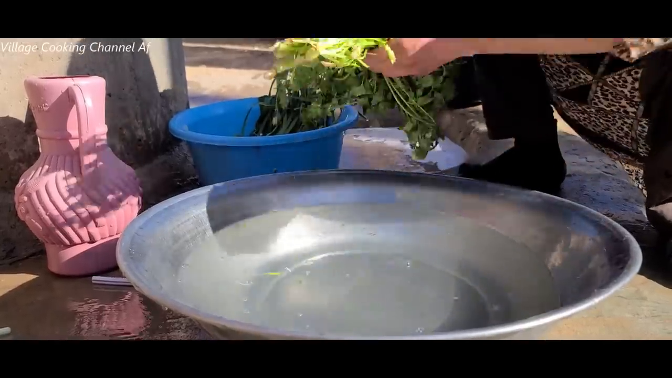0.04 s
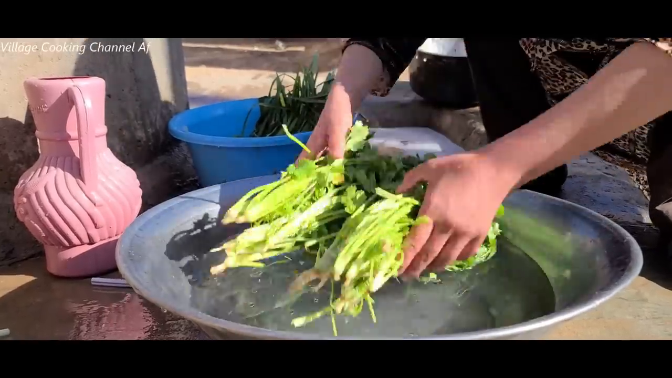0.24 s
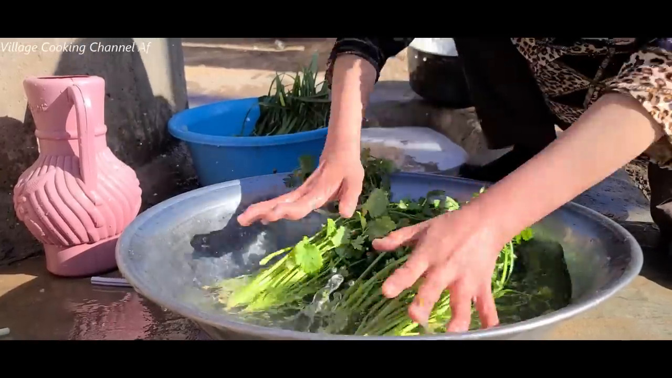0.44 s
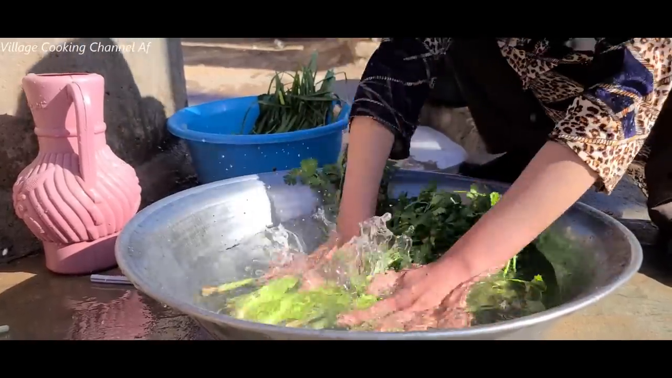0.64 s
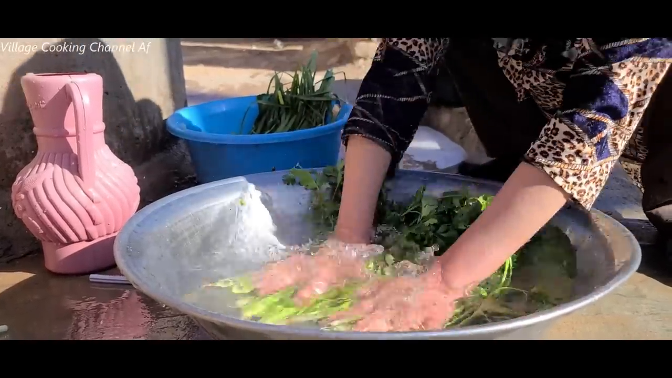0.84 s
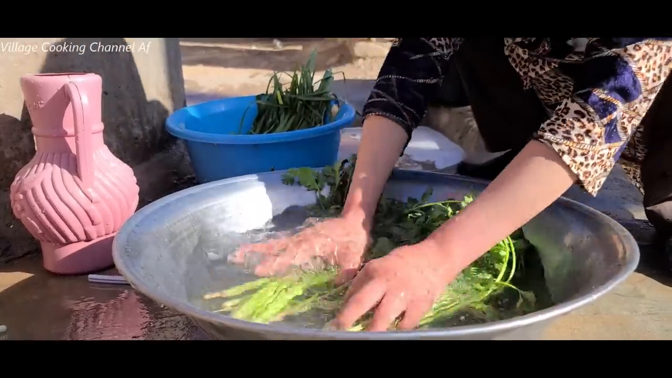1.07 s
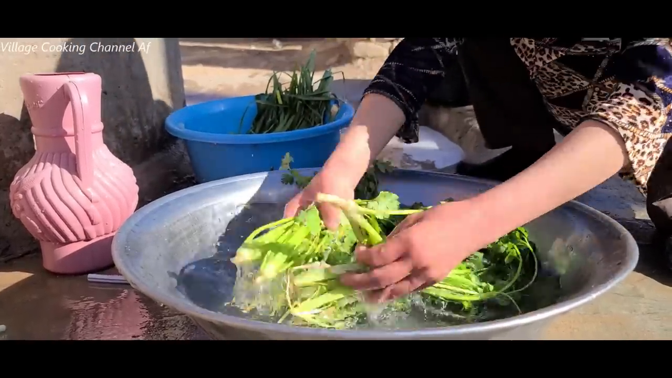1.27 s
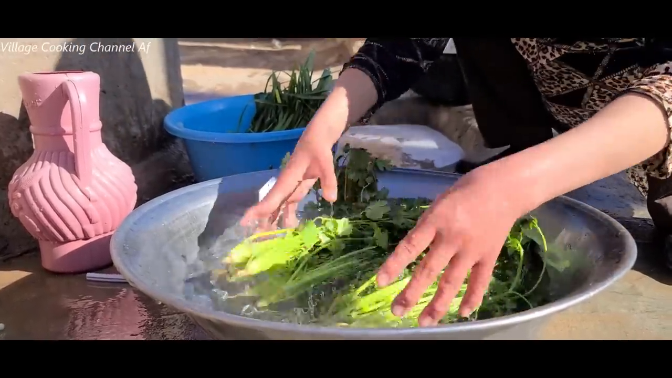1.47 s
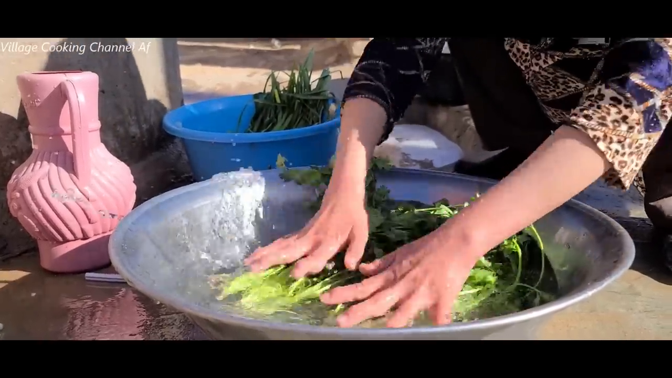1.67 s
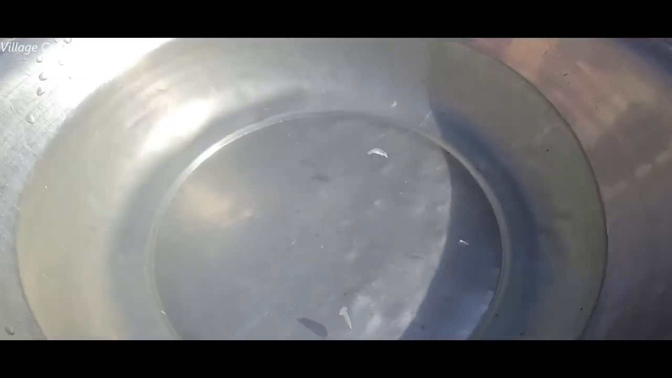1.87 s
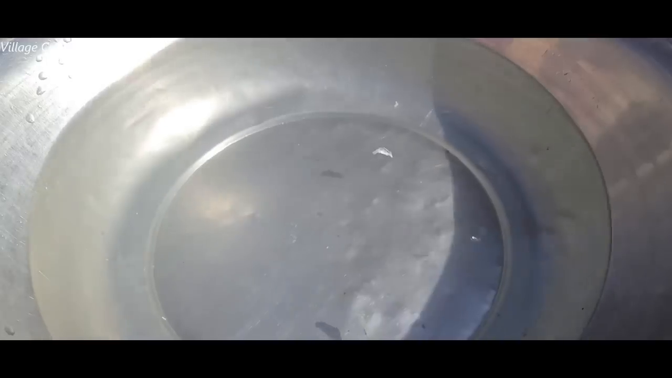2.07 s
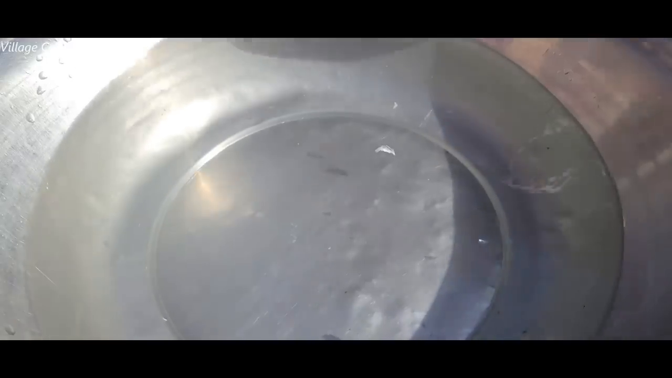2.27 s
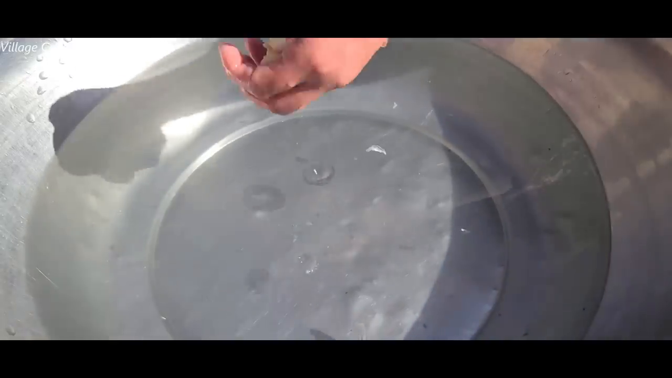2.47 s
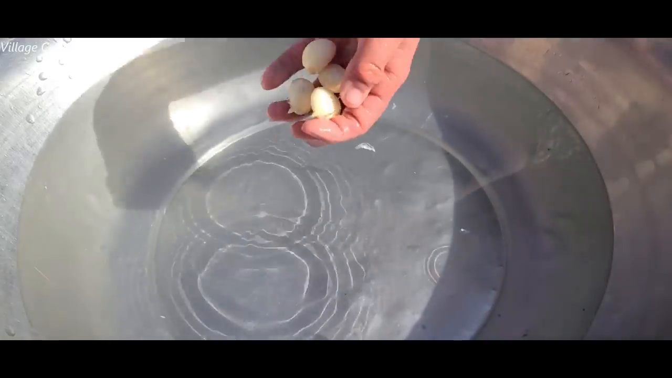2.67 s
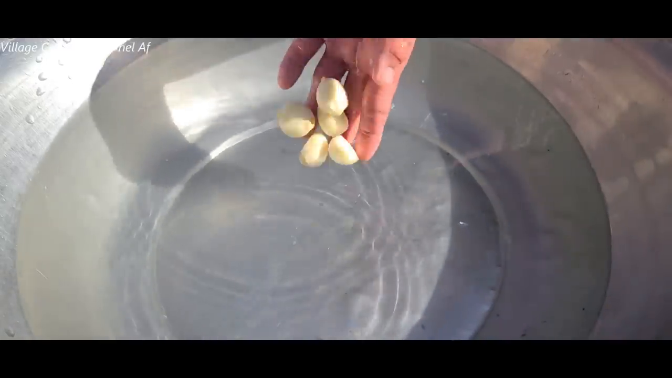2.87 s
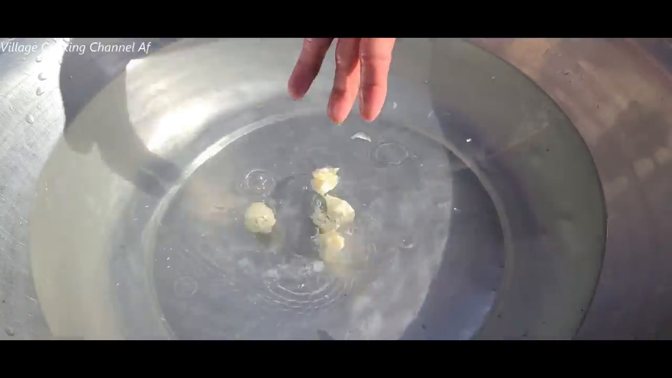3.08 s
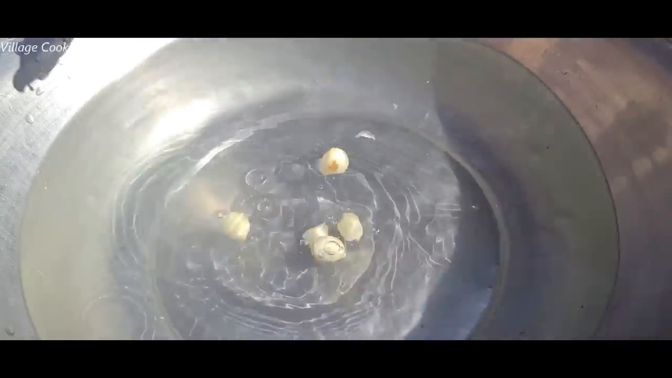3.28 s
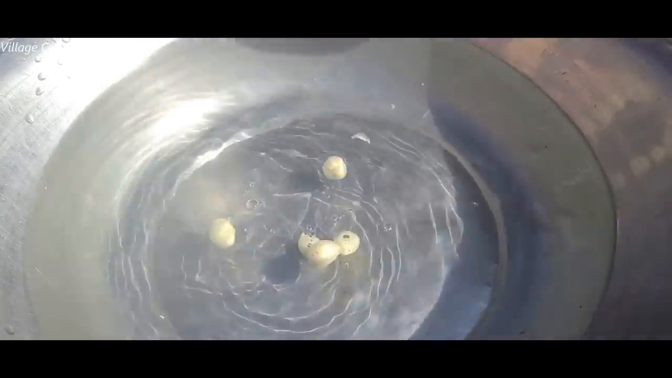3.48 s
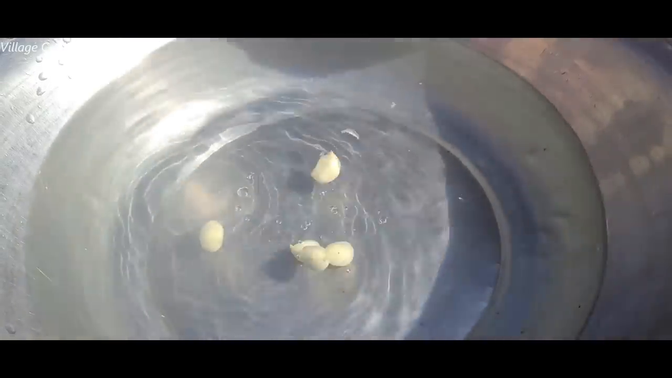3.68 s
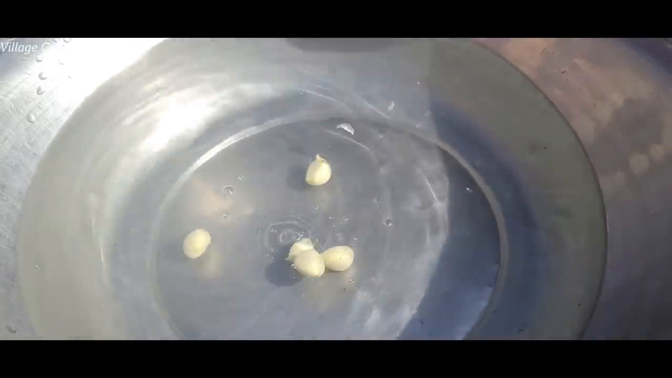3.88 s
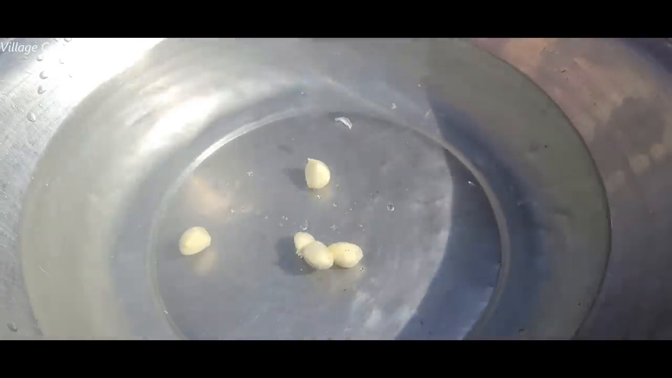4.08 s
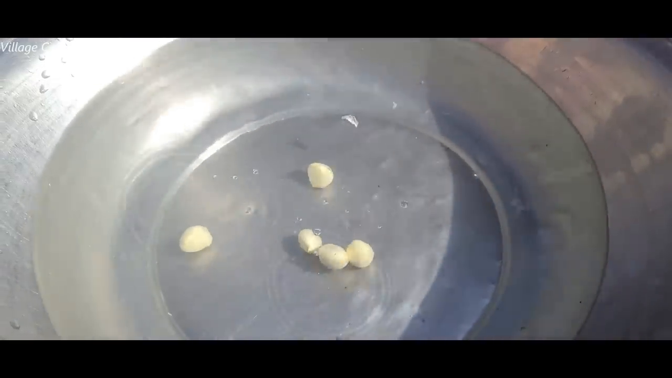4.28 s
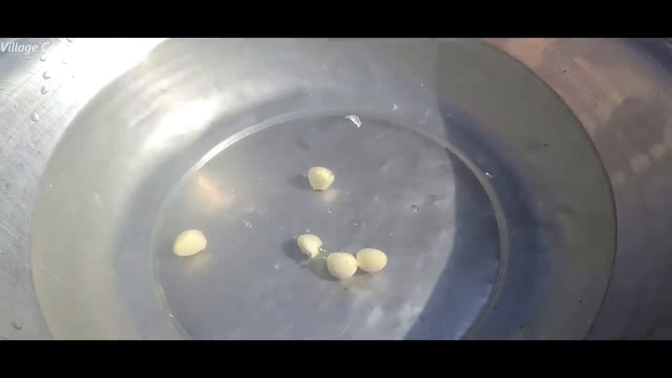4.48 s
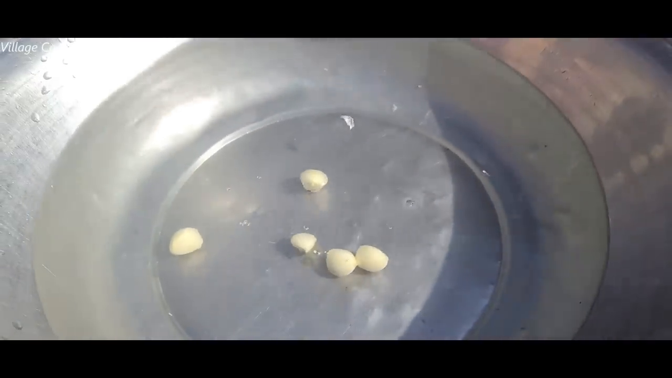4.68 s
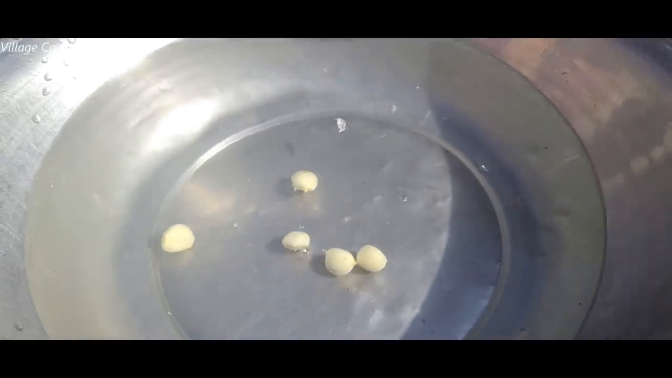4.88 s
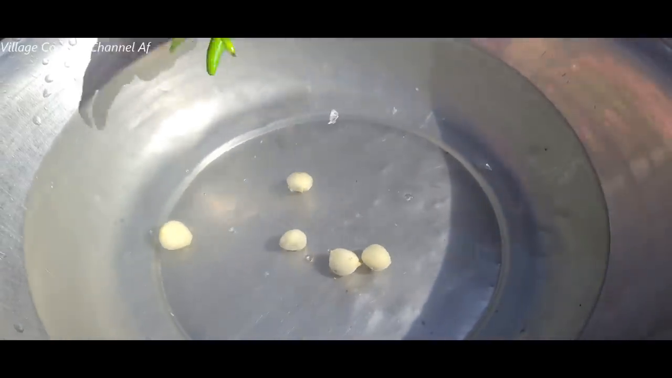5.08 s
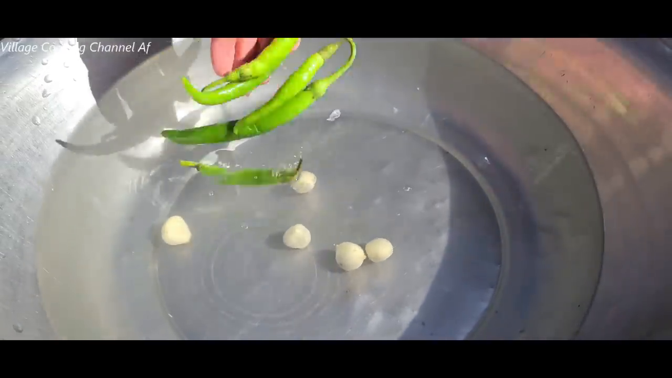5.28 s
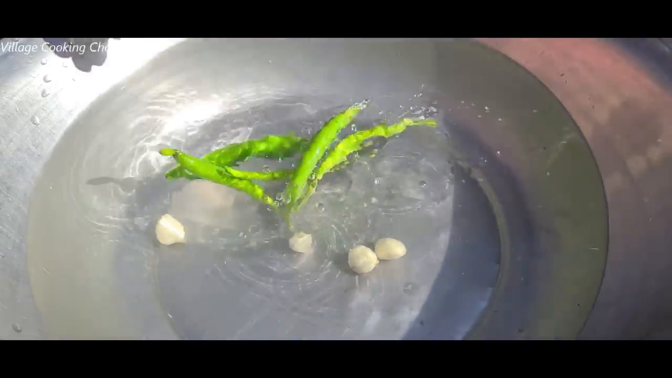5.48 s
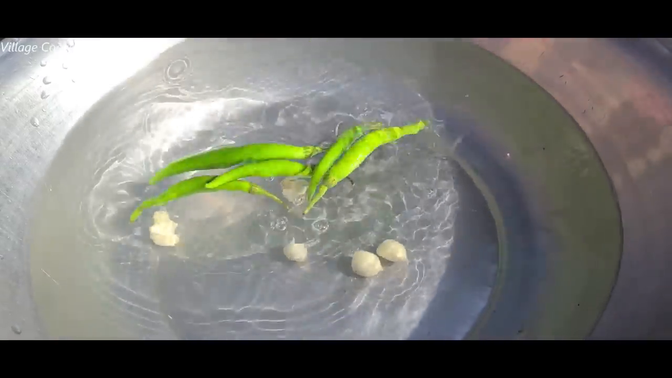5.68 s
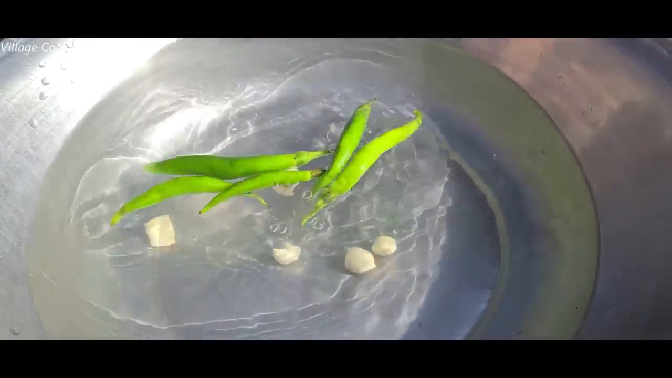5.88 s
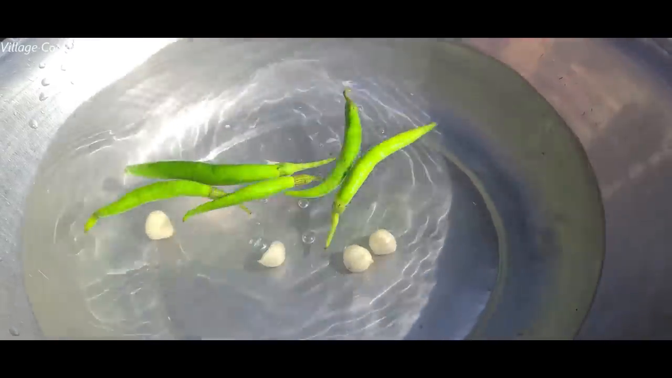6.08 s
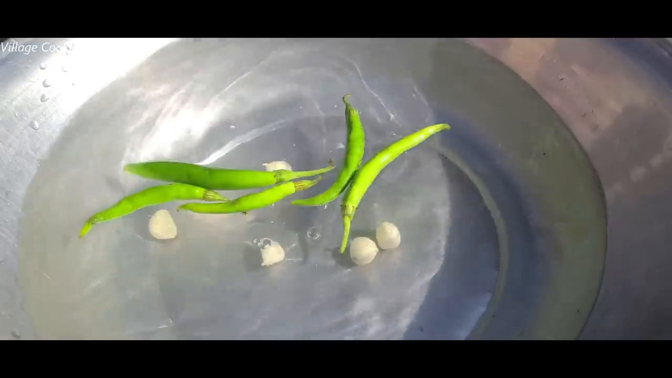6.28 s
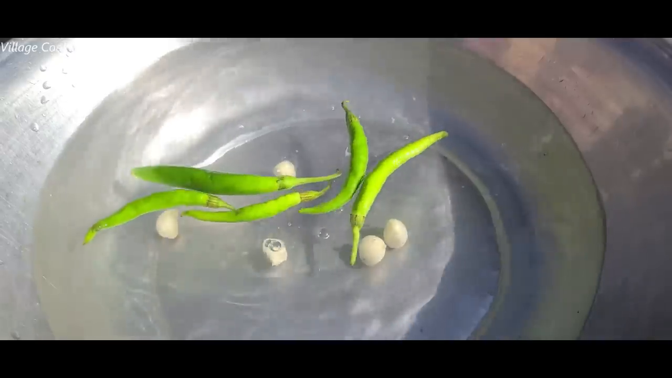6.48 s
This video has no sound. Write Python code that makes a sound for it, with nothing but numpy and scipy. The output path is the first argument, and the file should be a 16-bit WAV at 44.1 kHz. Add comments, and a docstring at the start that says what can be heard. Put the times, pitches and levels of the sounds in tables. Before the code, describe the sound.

Bunches of greens are pushed and lifted in a water-filled metal basin, with splashes, bubbly gulps, crackling spray and a faint metallic singing. It stops dead for a moment. Then, closer to the basin with low outdoor air, faint bumps precede garlic cloves that plop in and ring the bottom like a gong. Later chillies slap in more softly, followed by dull knocks.

```python
"""Hands dunk and lift greens in a wide metal basin of water: bubble clouds, crackling spray and gulps over a
faintly singing wall. A moment of silence. Then, nearer the basin over a low outdoor rush, a few dull bumps;
garlic cloves and later chillies drop in and ring its bottom like a gong, as decaying modes and a noise wash.
More dull bumps follow. Water is grains and rising tones; slaps, rustles and air are filtered noise."""
import sys
import numpy as np
from scipy import signal
from scipy.fft import rfft, irfft, next_fast_len
from scipy.io import wavfile
from scipy.ndimage import map_coordinates

SR = 44100
rng = np.random.default_rng(int(sys.argv[2]) if len(sys.argv) > 2 else 0)


def wrap_up_sound(samples):
    """Save the sound to the file named by the first command line argument, as 16-bit audio."""
    columns = np.atleast_2d(samples).T
    # keep every value between -1 and 1, then stretch to whole-number steps
    tamed = np.clip(columns, -1, 1)
    steps = np.round(tamed * 32767).astype(np.int16)
    wavfile.write(sys.argv[1], SR, steps)


N = 288472

# water running off the leaves: t/s, strength/dB (each layer adds its own offset)
TRICKLE = [(0, -57.5), (.2, -50), (.42, -53), (.52, -63.5), (.72, -45), (.92, -57.5), (1.15, -49.5),
           (1.53, -49.5), (1.66, -72)]
# vegetables land on the bottom: t/s, ring level/dB, off-centre share/0-1, clang level/dB,
# corner f/Hz above which the soft contact dulls the clang
BLOWS = [(3.007, -2, 0.41, -33, 4600), (3.05, -5.5, 0, -32, 7000), (3.062, -7, 0, -33.5, 5000),
         (3.11, -4.5, 0.26, -32, 3420), (5.463, -6, 1, -46, 1410), (5.523, -17.5, 0.94, -46.5, 1600),
         (5.579, -18.5, 1, -53, 2000)]
# columns of the push table
SLOSH_COLUMN, SPRAY_COLUMN = 2, 3


def rinsing(slosh_db=-2, spray_db=-1.0, blend_db=-38):
    """Each push of the hands stirs up a cloud of bubbles and throws a crackling spray; grains merge into foam."""
    # bubbling colour: f/Hz, level/dB
    slosh_colour = [(150, -22.5), (330, -9.5), (520, -0.5), (750, -4.5), (1050, 3), (1700, 5.5),
                    (2400, -11.5), (4000, -9), (9000, -68.5)]
    # spatter colour: f/Hz, level/dB
    spray_colour = [(700, -26.5), (1800, -8.5), (3300, 2.5), (5500, 0), (7500, -10.5), (10000, -11.5),
                    (12500, -3), (16000, -11)]
    trickle_slosh_db, trickle_spray_db = -3, -13  # over the trickle strength
    fallback_db, fallback_decay_s = -22, 0.074  # thrown spray rains back: level under the push
    # foam shares: in a trickle, in a hard push
    slosh_foam, spray_foam = (.35, .42), (.6, .25)

    trickle_db = over_time(TRICKLE)
    slosh_power = amp(trickle_db + trickle_slosh_db) ** 2 + pushed(SLOSH_COLUMN, slosh_db)
    spray_power = amp(trickle_db + trickle_spray_db) ** 2 + pushed(SPRAY_COLUMN, spray_db)
    spray_power = spray_power + pushed(SPRAY_COLUMN, fallback_db, fallback_decay_s)
    cloud = grains(count=5200, low_hz=350, high_hz=3800, cycles=8, spread_db=3.5, size=800)
    drops = grains(count=10000, low_hz=1800, high_hz=15500, cycles=9, spread_db=4.5, size=400)

    def foaming(power, grain, colour, foam_shares):
        """Shift from single grains to noise, or back, as the power grows."""
        in_trickle, in_push = foam_shares
        merged = in_trickle + (in_push - in_trickle) * power / (power + amp(blend_db) ** 2)
        single = unit(filtered(grain, lambda hz: amp(along(colour, hz)) * np.sqrt(hz)))
        foam = coloured(rng.standard_normal((2, N)), colour)
        return np.sqrt(power * (1 - merged)) * single + np.sqrt(power * merged) * foam

    slosh = foaming(slosh_power, cloud, slosh_colour, slosh_foam)
    return slosh + foaming(spray_power, drops, spray_colour, spray_foam)


def panned_rinsing():
    """Each band of the rinsing sits at its own place between left and right."""
    # f/Hz, left over right/dB
    spray_pan = [(1500, 0), (2400, 7.5), (4400, -5.5), (8000, -0.5), (13000, -1.5)]
    return filtered(rinsing(), lambda hz: amp(along(spray_pan, hz) * np.array([[.5], [-.5]])))


def pushed(column, gain_db=0, decay_s=None):
    """Summed power of all pushes in one column; each dies with its own length unless a decay is given."""
    # hands push or lift the greens: peak t/s, decay time/s, slosh level/dB, spray level/dB (before gain)
    pushes = [(0.296, 0.032, -34.5, -31), (0.339, 0.04, -30.5, -64), (0.563, 0.02, -38, -32.5),
              (0.598, 0.03, -36.5, -43.5), (0.685, .01, -42, -71), (0.717, 0.0026, -42, -41.5),
              (0.743, 0.011, -40.5, -37.5), (0.836, 0.029, -50, -51), (1.242, 0.023, -40, -56.5),
              (1.27, 0.023, -50, -52.5), (1.317, 0.056, -44, -46.5), (1.375, 0.011, -31, -41.5),
              (1.457, 0.022, -33.5, -39), (1.519, 0.022, -35.5, -34), (1.553, 0.021, -34.5, -50),
              (1.711, 0.015, -30, -26.5)]
    build_share = 0.62  # build-up time over push length
    power = 0
    for row in pushes:
        shape = swell(row[0], build_share * row[1], decay_s or row[1])
        power = power + (amp(row[column] + gain_db) * shape) ** 2
    return power


def heave():
    """Each push also shoves the body of water, which answers with a low glug."""
    under_slosh_db, centre_hz, relative_width = -22.5, 298, 0.39
    return np.sqrt(pushed(SLOSH_COLUMN, under_slosh_db)) * band(N, centre_hz, relative_width)


def rim():
    """Leaves and water brushing the metal keep its wall singing faintly: noise through resonances."""
    # wall resonances with greens in the basin: f/Hz, width/Hz, relative level/dB
    wall_modes = [(547, 25, -2), (625, 13, 7.5), (830, 36, 1), (1100, 28, 7), (1328, 57, 2.5),
                  (1760, 71, -0.5)]
    over_trickle_db, under_push_db, push_decay_s = -5, -12.5, 0.041
    opening_db, opening_decay_s = -48, 0.18  # still singing as the scene opens

    def wall(f):
        response = 0
        for k, (centre, width, db) in enumerate(wall_modes):
            resonance = 1j * f * width / (centre * centre - f * f + 1j * f * width)
            response = response + (-1) ** k * amp(db) * resonance
        return response

    brushing_colour = [(200, -12.0), (550, 1.5), (1700, -3.5), (4000, -12.5)]  # f/Hz, level/dB
    brushing = coloured(rng.standard_normal((2, N)), brushing_colour)
    power = amp(over_time(TRICKLE) + over_trickle_db) ** 2
    power = power + pushed(SLOSH_COLUMN, under_push_db, push_decay_s)
    power = power + (amp(opening_db) * swell(0, opening_decay_s, opening_decay_s)) ** 2
    return np.sqrt(power) * unit(swayed(filtered(brushing, wall)))


def swayed(x):
    """Rocking water bends the wall's tones: each side reads through a wandering delay."""
    drift_s, knots_per_s = 0.00062, 11
    at = np.arange(N)
    return np.array([map_coordinates(side, [at + drift_s * SR * wobble(knots_per_s)], order=1) for side in x])


def bubbles(level_db=-4):
    """Each gulp is one large air pocket with three smaller ones torn off around it."""
    # single bubbles: t/s, f/Hz, level/dB before level_db, relative pitch rise (scaled in pocket)
    gulps = [(.259, 1016, -28, 0.17), (0.306, 1390, -20.5, 0.076), (.345, 790, -27, .085),
             (0.357, 1720, -24.5, 0.054), (0.457, 4020, -35.5, .02), (.612, 995, -29.5, .13),
             (.617, 610, -31, .1), (.63, 1127, -33, .15), (.716, 2270, -36, .05), (.742, 663, -21.5, 0.17),
             (.82, 2090, -39, .05), (.831, 1003, -29.5, .12), (.851, 924, -27, 0.44),
             (0.874, 621, -27.5, 0.084), (1.065, 3940, -40.5, 0.022), (1.099, 4090, -42, .02),
             (1.179, 406, -24, 0.14), (1.203, 455, -29, 0.14), (1.229, 1533, -26.5, 0.2),
             (1.316, 1050, -23, .03), (1.336, 1674, -28.5, 0.11), (1.375, 996, -27, .1),
             (1.381, 1555, -28, 0.094), (1.384, 670, -32, 0.31), (1.399, 3970, -38, .03),
             (1.425, 578, -25, 0.1), (1.427, 1066, -18.5, 0.12), (1.457, 534, -35, .1),
             (1.458, 1060, -18, .05), (1.502, 1710, -25.5, 0.041), (1.511, 1010, -24.5, 0.092),
             (1.526, 865, -26.5, .05), (1.609, 1480, -34.5, .1), (1.695, 2970, -25.5, 0.054),
             (1.707, 3085, -25, 0.073), (2.225, 1470, -36, 0.1), (2.38, 812, -41.5, 0.088),
             (2.427, 736, -41.5, 0.33), (2.907, 442, -32, .08), (3.081, 665, -13, .1),
             (3.108, 864, -16, 0.18), (3.55, 2220, -39, .1), (5.396, 1286, -29.5, 0.091),
             (5.796, 1780, -43, .1), (6.256, 1890, -35.5, 0.059)]
    shard_db, log_pitch_scatter, delay_scatter_s = -14, .4, 0.0077
    out, t = np.zeros((2, N)), clock(.06)
    for s, hz, db, rise in gulps:
        add(out, s, amp(db + level_db) * pocket(t, hz, rise))
        for late, detune, side in rng.standard_normal((3, 3)):
            shard = pocket(t, hz * np.exp(log_pitch_scatter * abs(detune)), rise * rng.random())
            gain = amp(db + level_db + shard_db + side * np.array([[2], [-2]]))
            add(out, s + delay_scatter_s * abs(late), gain * shard)
    return out


def pocket(t, hz, rise, attack_s=0.0019):
    """An air pocket rings, rises in pitch as it nears the surface and is cut short as it breaks through."""
    life_1khz_s, size_law = 0.034, 0.11  # lower bubbles last longer by this power
    roughness, waver = 0.19, 0.018  # jostling: relative depths of level and pitch
    age = t / (life_1khz_s * (1000 / hz) ** size_law)
    pitch_hz = hz * (1 + 0.53 * rise * age + waver * wobble(220, size=len(t)))
    body = amp(-60 * age * (0.35 + 0.73 * age)) * (1 - np.exp(-t / attack_s))
    body = body * (1 + roughness * wobble(350, size=len(t)))
    return body * np.sin(2 * np.pi * np.cumsum(pitch_hz) / SR)


def slaps(width=0.3, level_db=-5, onset_cycles=0.96):
    """Noise cracks as the surface breaks, with fine splatter; low ones start softer and splatter less."""
    # slaps and drips: t/s, level/dB before level_db, centre f/Hz
    hits = [(0.242, -31, 1660), (.455, -38, 3940), (0.344, -25, 3500), (0.347, -19, 1300),
            (0.349, -32, 11800), (0.55, -26, 3150), (0.676, -23, 1160), (0.716, -37.5, 4900),
            (0.74, -33, 3740), (0.818, -30, 2470), (0.871, -31, 9250), (0.917, -29.5, 1070),
            (1.083, -39.5, 5200), (1.178, -29.5, 1820), (1.23, -35, 1500), (1.237, -38, 4800),
            (1.272, -31, 1450), (1.311, -32, 1300), (1.34, -29.5, 3460), (1.342, -33.5, 11400),
            (1.369, -30.5, 3070), (1.374, -26, 1190), (1.426, -29, 1400), (1.448, -29, 4940),
            (1.49, -36, 2390), (1.54, -30.5, 11800), (1.61, -33, 1460), (1.693, -25, 5570),
            (1.701, -31.5, 5670), (1.71, -23.5, 3200), (1.713, -25.5, 12500), (2.211, -39, 700),
            (2.211, -55, 11000), (2.72, -38.5, 1700), (2.987, -33, 4660), (2.985, -33, 12000),
            (3.007, -19, 780), (3.017, -24, 3600), (3.022, -33.5, 9900), (3.061, -33, 1300),
            (3.086, -49.5, 7300), (3.111, -22, 1020), (3.328, -47, 10800), (3.476, -47, 7300),
            (5.082, -46, 2800), (5.134, -43, 2260), (5.243, -41, 2630), (5.309, -52, 9850),
            (5.335, -38, 2090), (5.372, -48, 3100), (5.397, -36, 2800), (5.441, -46, 3050),
            (5.444, -48.5, 9500), (5.461, -21.5, 1100), (5.514, -24.5, 3570), (5.522, -48, 10800)]
    crack_t60_s, splatter_db, splatter_t60_s = 0.014, -15, 0.11
    out, t = np.zeros((2, N)), clock(0.06)
    for s, db, hz in hits:
        splatter = amp(splatter_db - 60 * t / splatter_t60_s + 2 * wobble(440, size=len(t)))
        shape = amp(-60 * t / crack_t60_s) + splatter * min(hz / 3000, 1)
        shape = shape * (1 - np.exp(-t * hz / onset_cycles))
        add(out, s, band(len(t), hz, width) * amp(db + level_db) * shape)
    return out


def basin(damping_db=17):
    """Each handful rings the long low modes anew; spreading ripples damp the higher ones ever faster."""
    # modes of the filled basin: f/Hz, level struck at centre/dB, level struck off centre/dB,
    # t60/s before ripple damping, left over right/dB
    modes = [(163, -46.5, -48, 0.61, 3), (222, -46.5, -52, 1.5, 5.5), (239, -49, -51.5, 1.57, 4),
             (320, -61, -44.5, 3, 3), (353, -37, -41, 0.7, 5), (384, -33, -54, 1.44, 0),
             (421.5, -37, -45.5, 2.7, -2), (485.8, -32.5, -71, 2.1, 3), (506.5, -32.5, -69, 1.86, -1),
             (546, -41, -64, 3.2, 2), (561, -45.5, -58, 4.1, 6), (569.5, -30.5, -55, 1, -6.5),
             (582.5, -39, -59, 2.8, -4), (647, -27, -32.5, 0.36, -1), (660, -25.5, -33, 0.48, 5),
             (764, -36.5, -69, 0.76, -3), (718, -37.5, -60, 1.8, 2), (815, -40.5, -56, 2.66, 0),
             (838, -38, -44.5, 0.84, -2), (865, -41.5, -47, 2.2, 5), (897, -36, -44.5, 2.2, 4),
             (938, -37, -52, 2.3, -1), (942, -38, -48, 1.7, 12), (963, -33.5, -46, 1.76, 1.5),
             (1054, -42, -46.5, 1.4, 0), (1267, -45, -65, 1.05, -5), (1396, -37.5, -54, 1.2, -3),
             (1430, -43, -46, 0.55, -2), (1482, -31, -59, 1.2, 1.5), (1670, -46, -50, 1.1, -5),
             (1900, -40.5, -49.5, 0.9, -5), (2105, -40, -68, .7, 4), (2195, -42, -69, 0.72, 2),
             (2790, -51.5, -70, 0.33, 2), (3520, -46.5, -74, 0.41, -6.5)]
    chillies_from_s = 5  # earlier blows are garlic
    contact_s = 0.00027
    garlic = [b for b in BLOWS if b[0] < chillies_from_s]
    chillies = [b for b in BLOWS if b[0] >= chillies_from_s]
    out, t = np.zeros((2, N)), clock(1.4)
    for handful in (garlic, chillies):
        first = handful[0][0]
        for hz, centre_db, edge_db, t60, pan_db in modes:
            energy = np.zeros(len(t))
            decay = amp(-60 * t / t60 - damping_db * hz / 1000 * t * t) ** 2
            decay = decay * (1 - np.exp(-t / contact_s)) ** 2
            for s, db, off, *_ in handful:
                share = np.clip(off, 0, 1)
                struck = (1 - share) * amp(centre_db) ** 2 + share * amp(edge_db) ** 2
                add(energy, s - first, decay * amp(db) ** 2 * struck)
            tone = ring(hz, np.sqrt(energy), waver=0.0048, spread=0.55)
            add(out, first, amp(pan_db * np.array([[.5], [-.5]])) * tone)
    return out


def ring(hz, size, waver, spread):
    """One mode at both ports; rocking water bends its pitch, less below 1 kHz, and makes it swell and sink."""
    treble = min(hz / 1000, 1)
    start, lead = rng.random() * 2 * np.pi, rng.normal(0, spread) * treble
    bend = 1 + waver * treble * wobble(15.8, size=len(size))
    phase = start + 2 * np.pi * hz * np.cumsum(bend) / SR
    rocking = amp(3 * wobble(18, size=len(size)) - .8)
    return size * rocking * np.sin((phase + np.array([[lead], [-lead]])).astype(np.float32))


def clang():
    """The thin metal's dense upper modes merge into a noise wash; each band dies at its own speed."""
    # dense upper modes: f/Hz, level/dB
    clang_colour = [(150, -24), (260, -11), (400, 2), (650, 0.5), (1000, -0.5), (1500, 0), (1750, -3.5),
                    (2200, 3), (2400, -7), (3150, -17), (3480, -4), (3750, -13.5), (4050, -7.5),
                    (4400, -20.5), (5700, -25.5), (6500, -39.5), (12000, -31)]
    # their decay: f/Hz, t60/s
    clang_life = [(200, 0.33), (700, 0.89), (1000, 1), (1500, 1), (2200, 0.41), (4000, 0.28), (6000, 0.51)]
    contact_s = 0.00077
    out, t = np.zeros((2, N)), clock(1.0)
    for s, _, _, db, soft_hz in BLOWS:
        noise = coloured(rng.standard_normal((2, len(t))), clang_colour)
        hz, when, z = signal.stft(noise, SR, nperseg=512)
        hz = hz[:, None]
        decay = amp(-60 * when / along(clang_life, hz))
        softness = np.sqrt(1 + (hz / soft_hz) ** 4)
        wash = signal.istft(z * decay / softness, SR, nperseg=512)[1]
        add(out, s, amp(db) * (1 - np.exp(-t / contact_s)) * wash[:, :len(t)])
    return out * amp([[.6], [-.6]])  # left/right dB


def plop():
    """The hollow behind the sinking garlic closes; its pitch sweeps up as it shrinks."""
    start_s, length_s, first_hz, pitch_ratio, peak_db = 3.047, .042, 636, 2.9, -23.5
    out, t = np.zeros((2, N)), clock(length_s)
    age = t / length_s
    tone = np.sin(2 * np.pi * np.cumsum(first_hz * pitch_ratio ** age) / SR)
    add(out, start_s, amp(peak_db) * np.sin(np.pi * np.sqrt(age)) * tone)
    return out


def sprinkle(peak_s=5.5, rise_s=0.21, fall_s=0.088, level_db=-58):
    """Fine drops fall from the wet chillies as they slide out of the hand and go under."""
    drops = grains(count=5000, low_hz=1800, high_hz=11000, cycles=5, spread_db=3.5, size=300)
    dulled = unit(filtered(drops, lambda hz: 1 / (1 + (hz / 4500) ** 2)))
    return amp(level_db) * swell(peak_s, rise_s, fall_s) * dulled


def bumps(level_db=-0.5, thud=0.39, cut_hz=90):
    """Soft, heavily damped knocks, tone plus low noise, that swell and die within a few cycles."""
    # dull bumps: peak t/s, level/dB before level_db, f/Hz, decay time/s
    knocks = [(2.008, -40, 253, 0.0054), (2.049, -41, 250, 0.0075), (2.14, -47, 322, 0.0083),
              (2.224, -47, 335, 0.013), (2.82, -36, 338, 0.0093), (5.843, -41.5, 345, 0.023),
              (6.129, -37, 316, 0.0082), (6.155, -41.5, 256, 0.01), (6.216, -28.5, 440, 0.011),
              (6.238, -12.5, 251, 0.0048), (6.241, -30, 100, 0.018), (6.247, -25, 326, 0.0041),
              (6.259, -27, 369, 0.011), (6.273, -21.5, 263, 0.0067), (6.294, -30, 191, 0.0089),
              (6.308, -36, 96, 0.024), (6.314, -30, 237, 0.011), (6.343, -35, 244, 0.014)]
    rise_s = 0.0015  # soft contact
    # f/Hz, level/dB
    thud_colour = [(40, -24), (90, 19), (150, 3.5), (500, 7.5), (850, -17), (2000, -14), (6000, -56)]
    out, t = np.zeros((2, N)), clock(.16) - 1 / 64
    for s, db, hz, fall in knocks:
        shape = np.exp(-(np.minimum(t, 0) / rise_s) ** 2 - np.maximum(t, 0) / fall)
        push = coloured(rng.standard_normal((2, len(t))), thud_colour)
        knock = thud * push - np.cos(2 * np.pi * hz * t)
        add(out, s + t[0], amp(db + level_db) * shape * knock)
    return filtered(out, lambda hz: hz ** 2 / (hz ** 2 + cut_hz ** 2))


def rustles():
    """Light rubbing of wet hands and leaves: one noise band swells and fades."""
    # rubs: peak t/s, decay time/s, level/dB, centre f/Hz
    rubs = [(.462, 0.037, -49.5, 3870), (2.725, 0.012, -46.5, 1790), (2.78, 0.041, -52.5, 2050),
            (3.53, 0.089, -51, 2050), (4.43, 0.056, -51.5, 1960), (5.09, 0.011, -55, 2700),
            (5.142, 0.024, -50.5, 2160), (6.222, 0.052, -44, 1260), (6.233, 0.027, -47, 2970),
            (6.373, 0.014, -46.5, 2520), (6.435, 0.0061, -51, 1790)]
    rise_over_decay, relative_width = 0.41, 0.33
    out, t = np.zeros((2, N)), clock(.5) - 1 / 8
    for s, fall, db, hz in rubs:
        shape = np.exp(np.minimum(t / (rise_over_decay * fall), -t / fall))
        add(out, s + t[0], band(len(t), hz, relative_width) * amp(db) * shape)
    return out


def ripples():
    """A faint, blurred lapping at the wall, livelier when the waves from a drop arrive."""
    lap_db, travel_s = -72, 0.53  # travel: impact to wall
    stir_db, stir_rise_s, stir_fall_s = -67.5, 0.022, 0.11  # after a blow of 0 dB
    level = amp(lap_db)
    for s, db, *_ in BLOWS:
        level = level + amp(stir_db + db) * swell(s + travel_s, stir_rise_s, stir_fall_s)
    return level * grains(count=600, low_hz=1300, high_hz=3200, cycles=12, spread_db=4, size=900)


def near_air(hiss_db=-59.5, grain_db=2.0, drift_db=2.0):
    """Outdoor air near the basin: a fluttering low noise rush under a grainy hiss."""
    # rush colour: f/Hz, level/dB
    rush_colour = [(15, -83), (25, -11.5), (75, -2), (124, -14.5), (151, -11), (255, -9.5), (350, 3),
                   (377, -0.5), (425, -13.5), (557, -7), (657, -15.5), (763, -14), (900, -30.5),
                   (1170, -45), (1980, -120)]
    # hiss colour: f/Hz, level/dB
    hiss_colour = [(600, -9), (1100, -3.5), (1800, -0.5), (3000, -6), (4300, -14.5), (5600, -18),
                   (7000, -28.5), (8100, -32.5), (8900, -20), (10500, -27), (16000, -28.5)]
    # rush level before flutter: t/s, level/dB
    rush_level = [(1.9, -54.5), (2.2, -50), (2.52, -59), (2.85, -50.5), (4.0, -51.5), (4.3, -55.5),
                  (4.9, -53), (5.15, -57.5), (5.8, -51.5), (6.03, -60), (6.15, -45), (6.5, -56.5)]
    flutter_db = 1.9 * wobble(22)
    rush = coloured(rng.standard_normal((2, N)), rush_colour) * amp(over_time(rush_level) + flutter_db)
    hiss_level = amp(hiss_db + drift_db * wobble(14) + grain_db * wobble(150))
    return rush + hiss_level * coloured(rng.standard_normal((2, N)), hiss_colour)


def far_air(level_db=-57.0):
    """Steady coloured noise behind the rinsing."""
    # f/Hz, level/dB
    air_colour = [(25, -2.5), (50, -2), (75, 9.5), (110, -6), (160, -15), (235, -10), (300, -14),
                  (380, -3.5), (600, -29), (2000, -14.5), (6000, -44), (16000, -40.5)]
    return amp(level_db) * coloured(rng.standard_normal((2, N)), air_colour)


def grains(count, low_hz, high_hz, cycles, spread_db, size):
    """A stream of tiny rising bubbles; each reaches the two ports with its own phase."""
    when, pitch, strength, angle = rng.random((4, count, 1))
    hz = low_hz * (high_hz / low_hz) ** pitch
    k = np.arange(size)
    turns = hz * k / SR
    life = np.exp(-turns / cycles) * (1 - np.exp(-2 * turns)) * (1 - k / size)
    gain = amp(spread_db * np.minimum(-np.log(1 - strength), 3))
    phase = 2 * np.pi * turns * (1 + 0.028 * np.minimum(turns / cycles, 4))
    at = ((when * N).astype(int) + k).ravel()
    lead = (angle - .5) * np.minimum((hz / 800) ** 2, 2 * np.pi)
    ports = []
    for side in (.5, -.5):
        wave = gain * life * np.sin(phase + side * lead)
        ports.append(np.bincount(at, wave.ravel(), N)[:N])
    return unit(np.array(ports))


def band(size, centre_hz, width):
    """Stereo noise of rms 1 around one pitch; the width is relative."""
    hump = lambda hz: (1 + (np.log((hz + 1) / centre_hz) / width) ** 2 / 2) ** -2
    return coloured(filtered(rng.standard_normal((2, size)), hump), [(1000, 0)])


def coloured(pair, spectrum):
    """Two unrelated signals become stereo of rms 1, alike in the bass and wide in the treble."""
    # f/Hz, left-right likeness/0-1
    alike = [(60, 0.95), (250, 0.81), (500, 0.52), (1000, 0.17), (2000, 0.018), (12000, 0.041)]

    def response(hz):
        turn = np.arccos(np.clip(along(alike, hz), -1, 1)) / 2
        return amp(along(spectrum, hz)) * np.array([np.cos(turn), np.sin(turn)])

    mid, side = filtered(pair, response)
    return unit(np.array([mid + side, mid - side]))


def filtered(x, response):
    """x shaped by a response over frequency, through a padded FFT."""
    n = x.shape[-1]
    m = next_fast_len(n + 4096)
    return irfft(rfft(x, m) * response(np.fft.rfftfreq(m, 1 / SR)), m)[..., :n]


def swell(s, rise, fall):
    """An exponential envelope that peaks at time s."""
    shape = np.zeros(N)
    near = np.arange(max(int((s - 8 * rise) * SR), 0), min(int((s + 8 * fall) * SR), N))
    t = near / SR - s
    shape[near] = np.exp(np.minimum(t / rise, -t / fall))
    return shape


def wobble(rate, size=N):
    """A smooth random curve, rate knots a second."""
    knots = rng.standard_normal(1024)
    coarse = np.arange(0, size + 64, 64)
    return np.interp(np.arange(size), coarse, map_coordinates(knots, [coarse * rate / SR], mode="wrap"))


def add(track, s, sound):
    """Mix a sound into a track from time s on."""
    part = track[..., max(round(s * SR), 0):][..., :sound.shape[-1]]
    part += sound[..., :part.shape[-1]]


def along(points, hz):
    """Interpolate (f/Hz, value) points on a log axis."""
    f, v = np.transpose(points)
    return np.interp(np.log(hz + 1), np.log(f + 1), v)


def over_time(points):
    """Interpolate (t/s, value) points at every sample."""
    s, v = np.transpose(points)
    return np.interp(np.arange(N) / SR, s, v)


def amp(db):
    """Decibels to amplitude."""
    return 10 ** (np.asarray(db) / 20)


def unit(x):
    """Scale to rms 1."""
    return x / np.sqrt(np.mean(x ** 2) + 1e-20)


def clock(seconds):
    """Sample times in seconds."""
    return np.arange(int(seconds * SR)) / SR


def scene():
    """Rinsing, a silence, then the drops; surface sounds run through both parts."""
    silence_start_s, silence_end_s, fade_s = 1.719, 1.872, .003
    t = np.arange(N) / SR
    greens = panned_rinsing() + rim() + heave() + far_air()
    drops = basin() + clang() + bumps() + near_air() + ripples() + sprinkle()
    surface = bubbles() + plop() + slaps() + rustles()
    before = np.clip((silence_start_s - t) / fade_s, 0, 1)
    after = np.clip((t - silence_end_s) / fade_s, 0, 1)
    return before * (greens + surface) + after * (drops + surface)


def record(dry):
    """The basin lies nearer the left port, which leads in phase; nothing is kept above the band limit."""
    # f/Hz, lead of the left port/rad
    port_lead = [(150, 0.11), (500, 0.54), (1000, 0.48), (1550, 1.97), (2200, 0)]
    top_hz = 16200
    halves = np.array([[.5], [-.5]])
    return filtered(dry, lambda hz: (hz < top_hz) * np.exp(1j * along(port_lead, hz) * halves))


dry = scene()
out = record(dry)
wrap_up_sound(out)
```